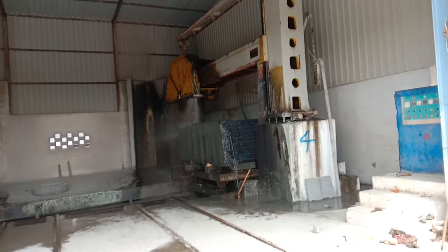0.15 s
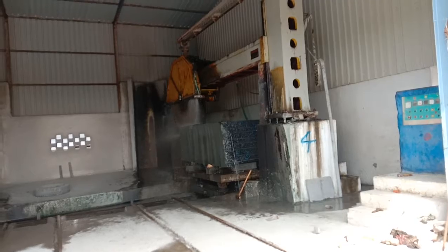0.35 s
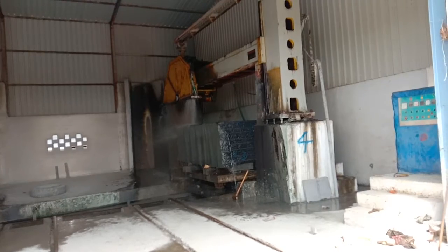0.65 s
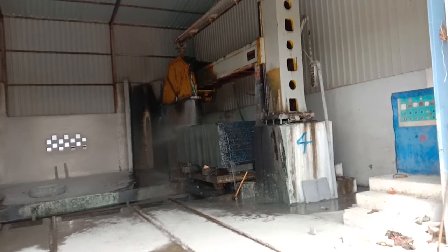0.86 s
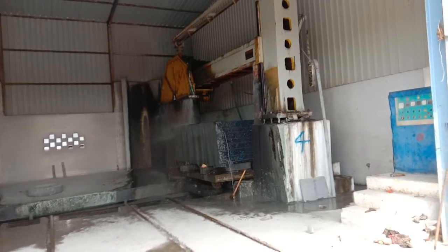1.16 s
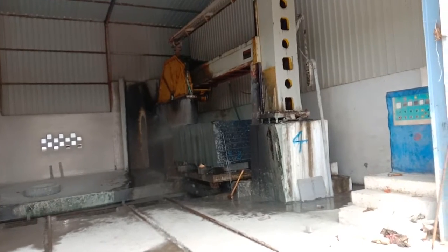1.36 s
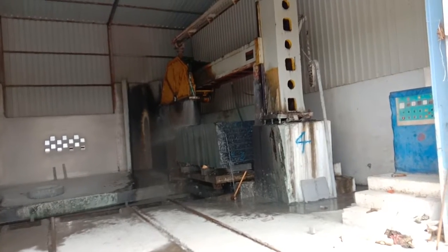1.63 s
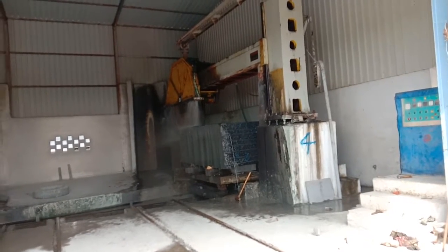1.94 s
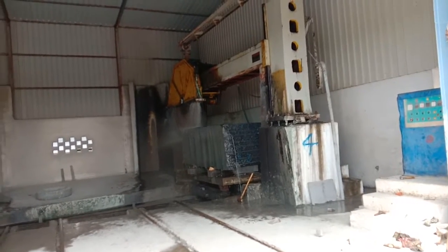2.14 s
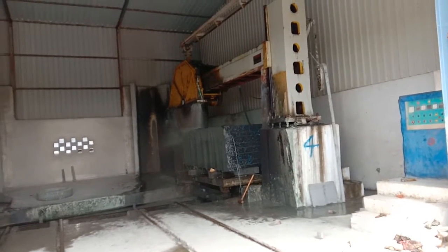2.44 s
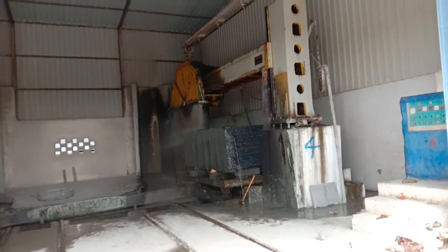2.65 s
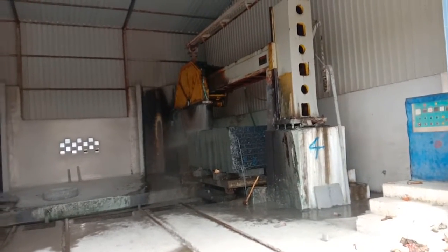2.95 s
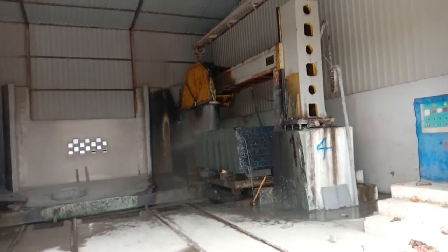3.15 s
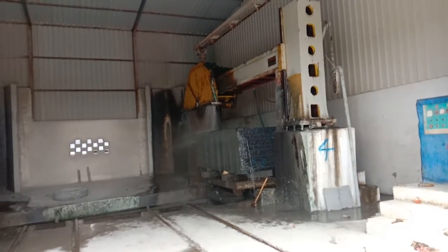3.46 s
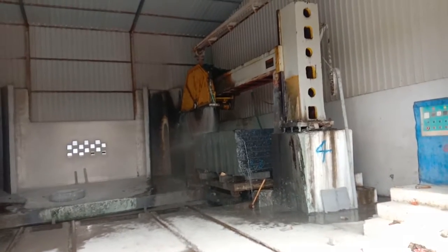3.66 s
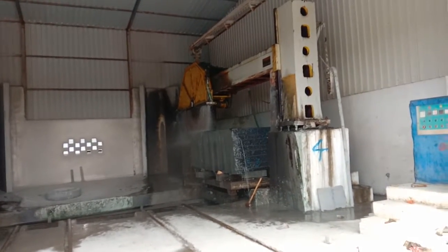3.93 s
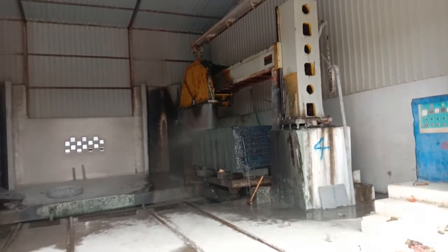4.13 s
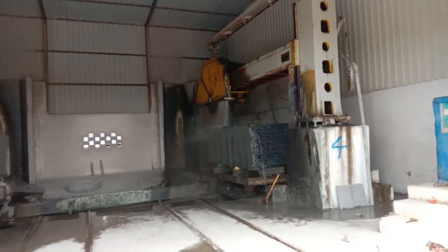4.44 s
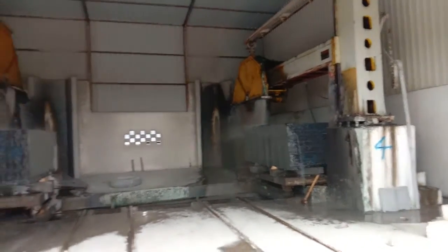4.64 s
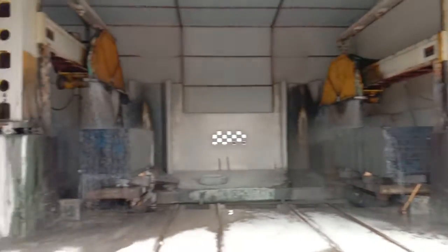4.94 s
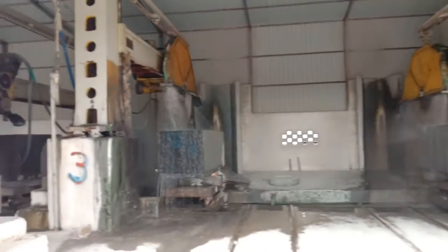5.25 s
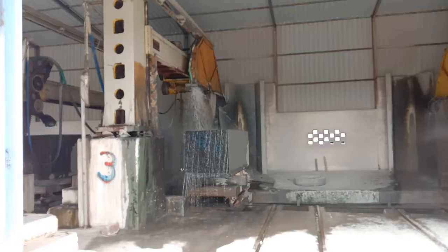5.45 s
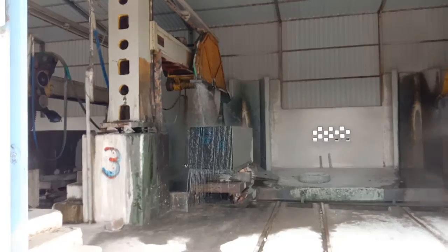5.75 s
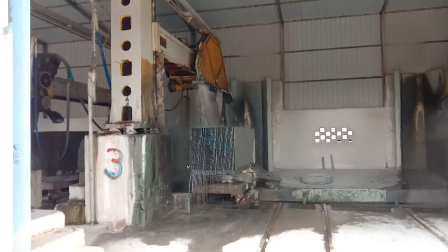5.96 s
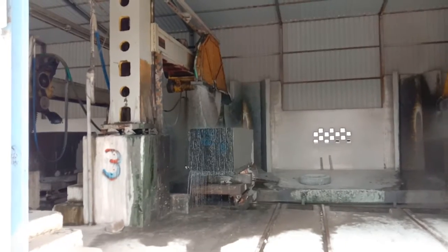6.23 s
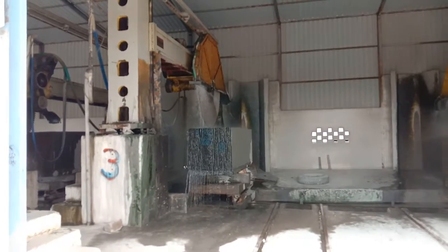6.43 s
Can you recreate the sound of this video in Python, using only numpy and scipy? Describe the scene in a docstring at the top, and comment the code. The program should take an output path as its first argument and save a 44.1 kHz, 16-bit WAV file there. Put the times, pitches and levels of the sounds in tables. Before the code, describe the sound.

Continuous harsh grinding of a stone-cutting blade with wavering metallic whines, spraying water and low rumble, gradually becoming hissier and less ringing.

```python
"""Stone saw in a shed

A big circular saw grinds through a stone block in a sheet-metal shed, heard from the doorway.
Scraping noise rings through the resonances of the steel disc, and wandering sine tones whine over it.
Filtered noise makes the hiss of water and grit, and the rumble and boom; throbbing tones make the drive.
The ringing eases while the hiss grows; in the last third the listener turns to a second saw."""
import sys
import numpy as np
from scipy import signal
from scipy.fft import rfft, irfft, next_fast_len
from scipy.io import wavfile

SR = 44100
rng = np.random.default_rng(int(sys.argv[2]) if len(sys.argv) > 2 else 0)


def unload_wav(signal):
    """Save mono or channel-first audio to the path in sys.argv[1] as 16-bit WAV at rate SR, clipped to [-1, 1]."""
    wavfile.write(
        sys.argv[1],
        SR,
        np.round(np.clip(np.atleast_2d(signal).T, -1, 1) * 32767).astype(np.int16),
    )


N = 290619   # length in samples

TURNS_PER_S = 3.648   # speed of the blade
# Outlines give relative loudness per Hz; resonances stand on them, or cut into them if negative.
# outline of the ringing disc: f/Hz, level/dB
DISC_OUTLINE = [(300, -21.5), (700, -17.5), (1000, -14), (1170, -8), (1230, -2.5), (1500, -4), (1850, -1),
                (2100, -4.5), (2500, -7.5), (3000, -14.5), (3600, -20.5), (6000, -53)]
# resonances of the disc: f/Hz, width/Hz, level over outline/dB
DISC_RESONANCES = [(1032, 65, 6.5), (1107, 30, 2), (1235, 32, 3.5), (1310, 34, 1), (1296, 39, 2.5),
                   (1420, 45, 3), (1530, 15, 4), (1594, 24, 3), (1710, 32, 3), (1795, 22, 3),
                   (1945, 28, 0.5), (1984, 47, 4), (2175, 39, 2.5), (2338, 70, 4), (2517, 57, 4),
                   (2556, 56, -4), (2760, 15, 4.5)]
# outline of the water and grit hiss: f/Hz, level/dB
HISS_OUTLINE = [(1200, -8.5), (2000, -4), (2700, -1), (3400, -1.5), (3800, -5.5), (5300, -0.87), (6600, -3),
                (8000, -6.5), (8900, -11.5), (9900, -12), (11500, -19.5), (13100, -22.5), (13950, -25.5),
                (15500, -15.5)]
# bands in the hiss: f/Hz, width/Hz, level over outline/dB
HISS_RESONANCES = [(2790, 64, 2.5), (2930, 50, 1), (3140, 280, 2.5), (3400, 270, 1), (3580, 86, -2.5),
                   (3750, 50, 3), (4700, 80, 4.5), (5980, 720, 7.5), (6050, 160, 1.5), (6630, 300, -3),
                   (7350, 890, 7.5), (14730, 920, 10.5), (15560, 400, 5)]
# outline of the shed rumble: f/Hz, level/dB
RUMBLE_OUTLINE = [(100, -8.5), (170, -9), (210, 2), (290, -3.5), (390, -2.5), (600, 1.5), (950, -5.5),
                  (1300, -1.5), (2500, -36)]
# resonances of guard and frame: f/Hz, width/Hz, level over outline/dB
FRAME_RESONANCES = [(257, 8.6, 2.5), (359, 26, 5.5), (390, 22, 6.5), (431, 11, 6.5), (511, 20, 4),
                    (545, 20, -2.5), (574, 12, 3.5), (640, 70, -1), (750, 21, 6.5), (806, 39, 5.5)]
# whining tones of the blade: f/Hz, width/Hz, level at friction 1/dB, level at friction 0/dB
WHINE_TONES = [(756, 12.13, -47.5, -56), (768, 8.85, -44.5, -49.5), (885, 4, -44.5, -63),
               (1257, 4.07, -38, -37), (1274, 5.8, -32, -47), (1303, 9.8, -32.5, -56),
               (1710, 4.9, -35, -52), (1816, 7.6, -34.5, -50)]
# outline of the low boom: f/Hz, level/dB
BOOM_OUTLINE = [(20, -19), (40, -18), (60, -11), (76, 5.5), (90, 7), (106, 1), (130, -2), (185, 5.5),
                (260, -22)]
# outline of the second saw's hiss: f/Hz, level/dB
NEIGHBOUR_OUTLINE = [(1500, -22), (2400, -8), (3100, -1), (4100, -3.5), (5000, -8), (7000, -16),
                     (10000, -17), (15000, -26)]
# brief swells and dips of scrape and hiss: t/s, change of disc level/dB, change of spray level/dB
BRIEF_CHANGES = [(0.32, 1.5, -0.5), (0.9, 2.3, 1.5), (1.58, 2.5, 1.5), (1.89, 1.2, 1), (2.54, 0, 0.5),
                 (3.0, 2, 0.3), (3.6, 1.5, 1.5), (4.09, 0.5, -0.2), (4.53, 0, 2), (4.9, 2.3, 1.5),
                 (5.17, 1.5, 2), (5.95, 2.5, 1), (6.33, -1.5, 2)]
# the cut: t/s, load on the blade (0 light - 1 heavy), friction of its flanks in the slot (0-1)
CUT_COURSE = [(0, 1, 0.87), (1.05, 1, 0.88), (2.2, 0.75, 0.96), (2.75, 0.64, 0.5), (3.4, .22, 0.2),
              (4.3, 0.17, .1), (6.59, 0, 0.2)]
# hiss of the spray before the brief changes: t/s, level/dB
SPRAY_COURSE = [(0, -19.5), (1.8, -19.5), (2.6, -18.5), (3.35, -17.5), (4.3, -18), (6.2, -17.5),
                (6.59, -18)]
# rumble before its gain: t/s, level/dB
RUMBLE_COURSE = [(0, -31.5), (2.2, -32.5), (2.95, -31.8), (3.75, -33), (4.55, -36), (5.55, -32.5),
                 (6.59, -33.5)]
# low boom before its wavering: t/s, level/dB
BOOM_COURSE = [(0, -50), (1.3, -53), (2.2, -51), (3.65, -44), (4.25, -49.5), (5.45, -48.5), (5.8, -44.5),
               (6.59, -45)]
# drive: t/s, hum level/dB, drone level/dB
DRIVE_COURSE = [(0, -49, -45), (1.1, -47.5, -43.5), (2.3, -47.5, -38), (3.3, -47, -38), (4.2, -51.5, -41.5),
                (5.3, -54, -48), (6.2, -52, -39.5), (6.59, -50, -46)]

DISC_LIGHT_DB, DISC_HEAVY_DB = -24, -18.5   # before brief changes and wavering: louder under load
CHANGE_S = 0.033   # time from the peak of a brief change to 37 % of its height in dB
WHINE_WANDER_PER_S, WHINE_FLICKER_DB, WHINE_FLICKER_PER_S = 7.17, 2.7, 3.7
# the turn to the second saw: start, length, and level of its hiss once faced
FACING_S, FACING_LENGTH_S, NEIGHBOUR_DB = 4.55, 0.64, -30
CUTOFF_HZ = 15560   # nothing is left from here up


def from_db(db):
    """Turn decibels into a gain."""
    return 10 ** (np.asarray(db) / 20)


def rms_one(x):
    """Scale to an average strength (rms) of 1."""
    return x / np.sqrt(np.mean(x ** 2) + 1e-20)


def seconds():
    """Time of each sample."""
    return np.arange(N) / SR


def in_time(rows):
    """Join the points of a table with straight lines, one curve for each column after the time."""
    s, *columns = np.transpose(rows)
    return [np.interp(seconds(), s, column) for column in columns]


def drift(rate):
    """Slow random wandering with spread 1; a higher rate (Hz) wanders faster."""
    step = 40   # samples between points of the slow curve
    pole = np.exp(-2 * np.pi * rate * step / SR)
    noise = rng.standard_normal(N // step + 2002)
    slow = signal.lfilter([1], [1, -2 * pole, pole * pole], noise)
    slow = rms_one(slow[2000:])   # skip the filter's start
    return np.interp(np.arange(N) / step, np.arange(len(slow)), slow)


def coloured(x, outline, resonances):
    """Pass a steady sound through a body: a broad outline with resonances standing on it; rms 1."""
    size = next_fast_len(N)
    hz = np.maximum(np.arange(size // 2 + 1) * SR / size, 1)
    outline_hz, outline_db = np.transpose(outline)
    db = np.interp(np.log(hz), np.log(outline_hz), outline_db)
    # a body gives off little sound below its range
    db = db - 20 * np.log10(np.maximum(outline_hz[0] / hz, 1) ** 2)
    for centre, width, height in resonances:
        half_widths = 2 * (hz - centre) / width
        db = db + height * 0.5 ** np.minimum(half_widths ** 2, 20)
    return rms_one(irfft(rfft(x, size) * from_db(db), size)[:N])


def every_turn(one_turn):
    """Repeat what happens in one turn of the blade."""
    return np.resize(one_turn, N)


def brief_changes():
    """Short rounded swells and dips: one curve in dB for the disc, one for the spray."""
    total = np.zeros((2, N))
    for s, *changes_db in BRIEF_CHANGES:
        shape = np.exp(-((seconds() - s) / CHANGE_S) ** 2)
        total += np.outer(changes_db, shape)
    return total


def rim_scrape(same_share, uneven_db, count=14):
    """Grit grinds under the rim: partly the same on every turn, and some sectors scrape harder."""
    turn = round(SR / TURNS_PER_S)   # samples in one turn
    share = np.clip(same_share, 0, 1)
    same_grit = every_turn(rng.standard_normal(turn))
    fresh_grit = rng.standard_normal(N)
    grit = np.sqrt(share) * same_grit + np.sqrt(1 - share) * fresh_grit
    place = np.arange(turn) / turn * count   # position on the rim, in sectors
    sector_force = np.interp(place, np.arange(count), rng.standard_normal(count), period=count)
    force = sector_force + np.cos(2 * np.pi * place)
    return grit * from_db(uneven_db * every_turn(force))


def disc():
    """The scraping rim sets the resonances of the steel disc ringing."""
    load, _ = in_time(CUT_COURSE)
    change_db, _ = brief_changes()
    load_db = DISC_LIGHT_DB + load * (DISC_HEAVY_DB - DISC_LIGHT_DB)
    level_db = load_db + change_db + 0.25 * drift(9.8)
    scrape = rim_scrape(same_share=0.11, uneven_db=0.17)
    return from_db(level_db) * coloured(scrape, DISC_OUTLINE, DISC_RESONANCES)


def whines():
    """The blade's flanks rub in the slot and keep a few tones singing, unsteady in pitch and level."""
    _, friction = in_time(CUT_COURSE)
    out = np.zeros(N)
    for hz, width, high_db, low_db in WHINE_TONES:
        pitch_hz = hz + 0.5 * width * drift(WHINE_WANDER_PER_S)
        phase = 2 * np.pi * np.cumsum(pitch_hz) / SR
        flicker_db = WHINE_FLICKER_DB * drift(WHINE_FLICKER_PER_S)
        level_db = low_db + friction * (high_db - low_db) + flicker_db
        out += from_db(level_db) * np.sqrt(2) * np.sin(phase)   # root 2 gives the sine rms 1
    return out


def spray(spatter_db, spatter_rate):
    """Water and slurry leave the rim in an uneven sheet, a hiss with brief swells and dips."""
    level_db, = in_time(SPRAY_COURSE)
    _, change_db = brief_changes()
    jet = rng.standard_normal(N) * from_db(spatter_db * drift(spatter_rate))
    return from_db(level_db + change_db) * coloured(jet, HISS_OUTLINE, HISS_RESONANCES)


def throbbing_tone(order, count, crest_s, swell_db, waver_db, slip):
    """A tone geared to the blade: order cycles and count swells per turn, slip radians of wander."""
    turns = TURNS_PER_S * (seconds() - crest_s)   # a swell peaks at crest_s
    level_db = swell_db * np.cos(2 * np.pi * count * turns) + waver_db * drift(6.8)
    tone = np.sin(2 * np.pi * order * turns + slip * drift(5.1))
    return rms_one(from_db(level_db) * tone)


def drive():
    """The hum swells once per turn, the drone about an octave above twice, the upper drone once."""
    hum_db, drone_db = in_time(DRIVE_COURSE)
    hum = throbbing_tone(order=30.2, count=1, crest_s=2.39, swell_db=7, waver_db=1, slip=0.45)
    drone = throbbing_tone(order=60.6, count=2, crest_s=2.347, swell_db=5, waver_db=1.5, slip=0.9)
    upper_drone = throbbing_tone(order=69, count=1, crest_s=2.5, swell_db=3.5, waver_db=2.5, slip=0.8)
    drones = drone + from_db(-7) * upper_drone
    return from_db(hum_db) * hum + from_db(drone_db) * drones


def shed_rumble(rumble_gain_db, boom_waver_db):
    """Guard and frame rumble over the lumpy low boom of the shed."""
    rumble_db, = in_time(RUMBLE_COURSE)
    boom_db, = in_time(BOOM_COURSE)
    rumble = coloured(rng.standard_normal(N), RUMBLE_OUTLINE, FRAME_RESONANCES)
    boom = coloured(rng.standard_normal(N), BOOM_OUTLINE, [])
    boom_db = boom_db + boom_waver_db * drift(4)
    return from_db(rumble_db + rumble_gain_db) * rumble + from_db(boom_db) * boom


def neighbour():
    """A second wet saw across the shed adds a lower hiss as the listener turns to it."""
    facing = np.clip((seconds() - FACING_S) / FACING_LENGTH_S, 0, 1)
    hiss = coloured(rng.standard_normal(N), NEIGHBOUR_OUTLINE, [])
    return facing * from_db(NEIGHBOUR_DB) * hiss


def sag(at_s, width_s, depth_db):
    """The level of the whole wash dips for a moment."""
    return from_db(-depth_db * np.exp(-((seconds() - at_s) / width_s) ** 2))


def scene():
    """The shed blends everything into one wash, alike in both ears."""
    shed = disc() + whines() + spray(spatter_db=0.57, spatter_rate=30)
    shed = shed + drive() + shed_rumble(rumble_gain_db=0.5, boom_waver_db=1.5)
    shed = shed + neighbour()
    shed = shed * sag(at_s=4.832, width_s=0.022, depth_db=2.6)
    return np.array([shed, shed])


def record(dry):
    """Cut the top steeply: the gain falls to zero over the last 100 Hz below the cutoff."""
    size = next_fast_len(N + 2000)   # spare room at the end
    hz = np.arange(size // 2 + 1) * SR / size
    gain = np.clip((CUTOFF_HZ - hz) / 100, 0, 1)
    return irfft(rfft(dry, size) * gain, size)[:, :N]


dry = scene()
out = record(dry)
unload_wav(out)
```